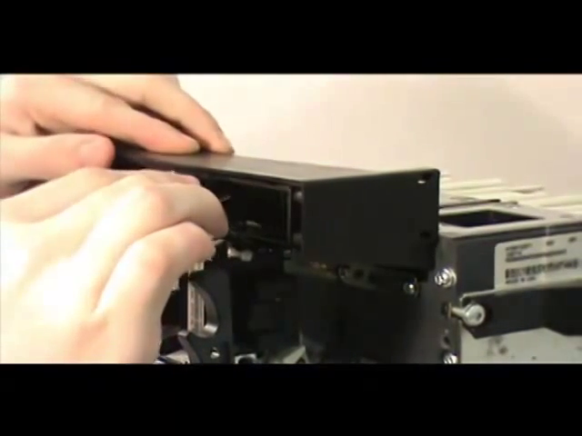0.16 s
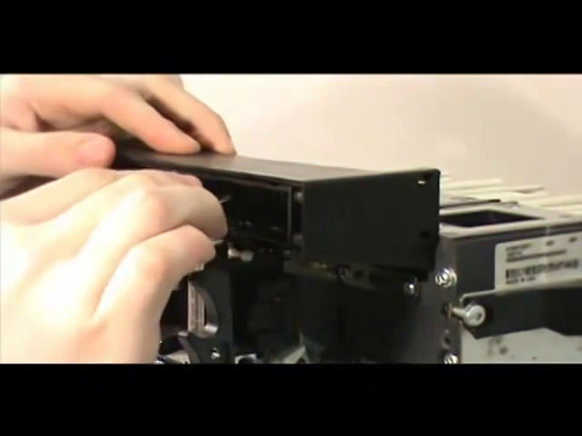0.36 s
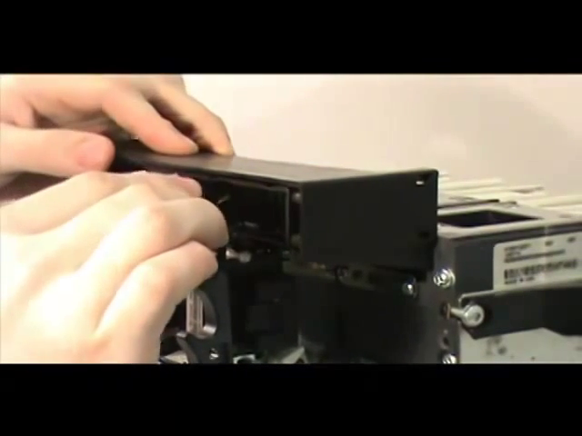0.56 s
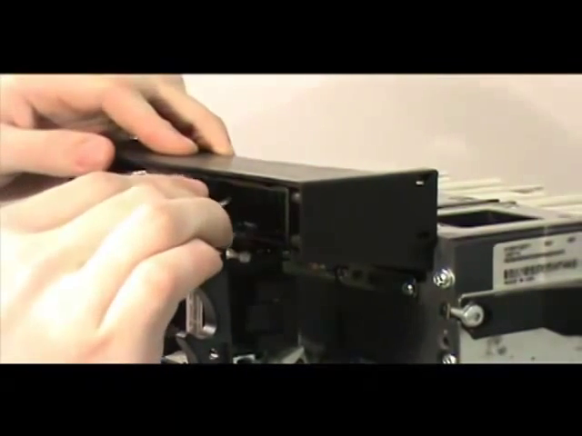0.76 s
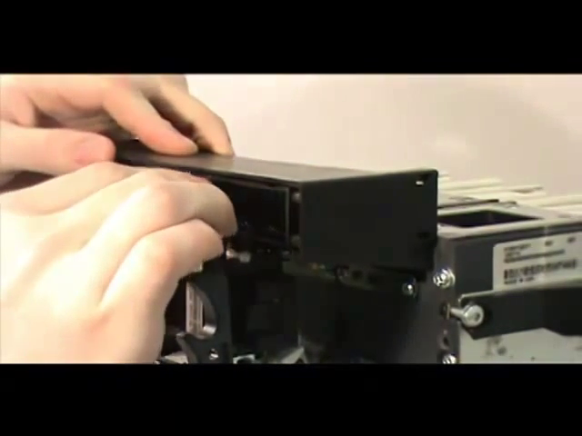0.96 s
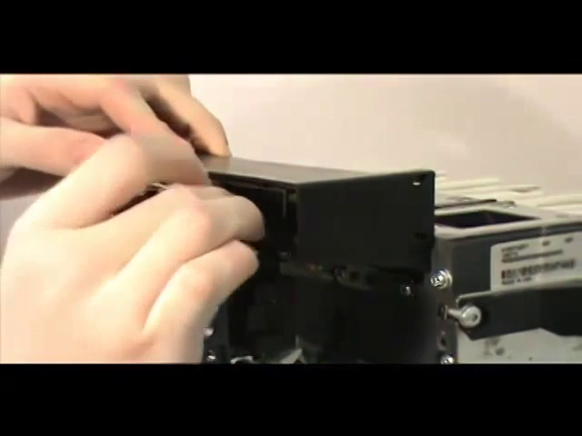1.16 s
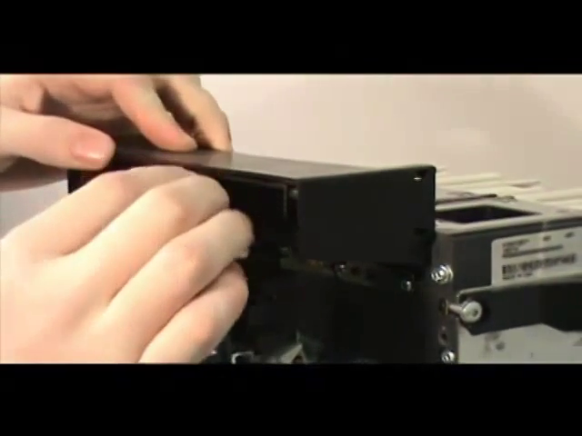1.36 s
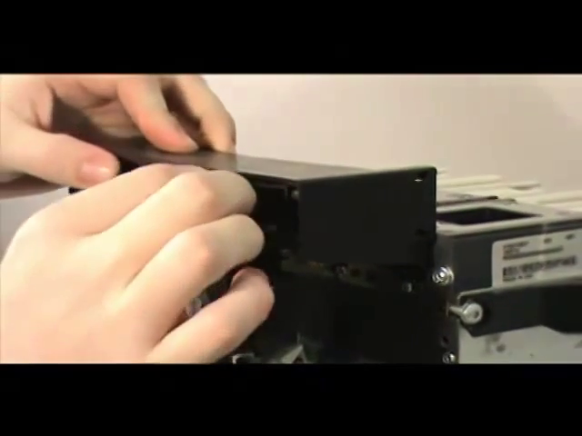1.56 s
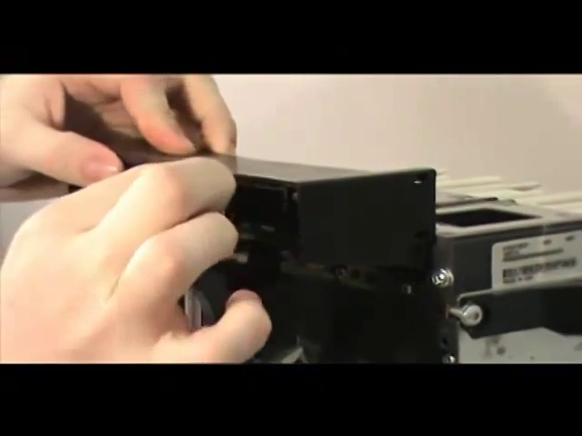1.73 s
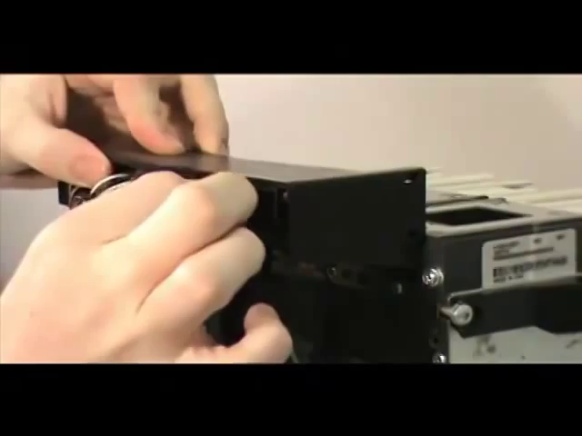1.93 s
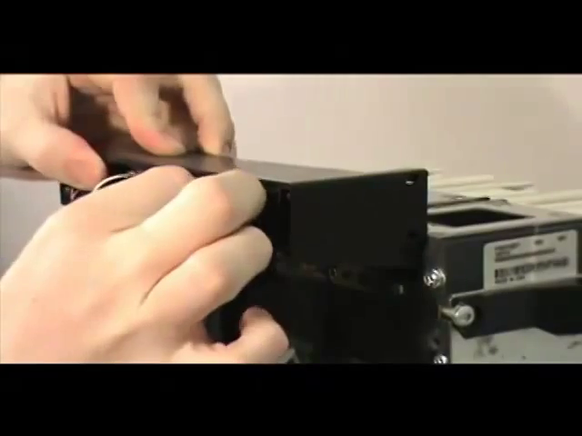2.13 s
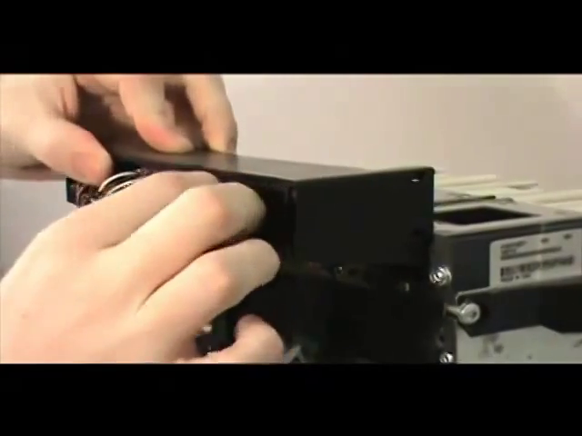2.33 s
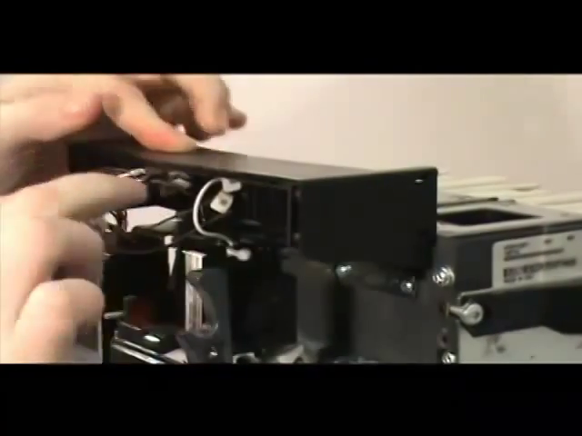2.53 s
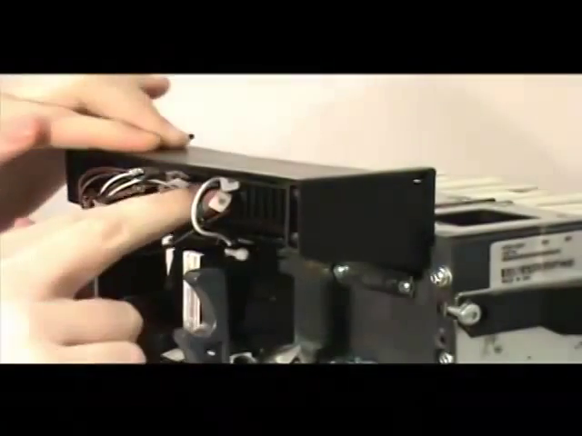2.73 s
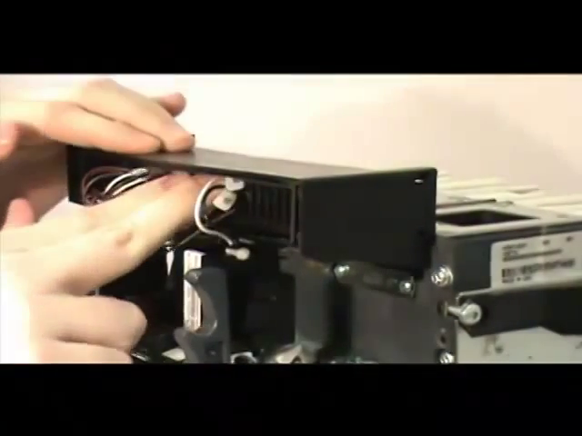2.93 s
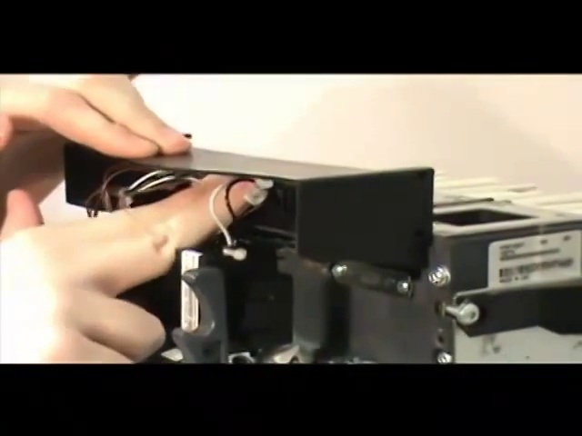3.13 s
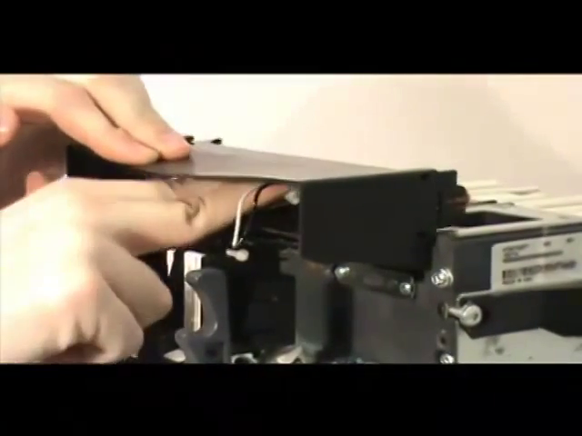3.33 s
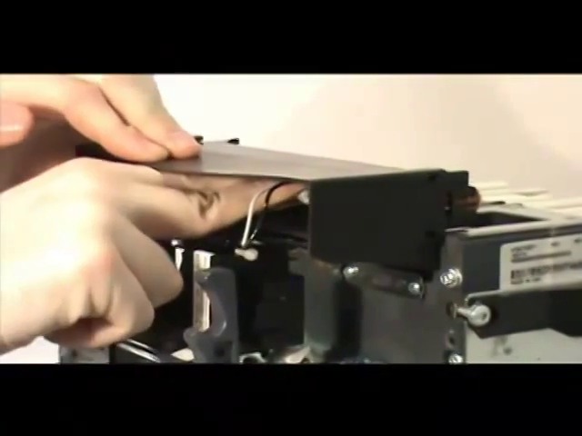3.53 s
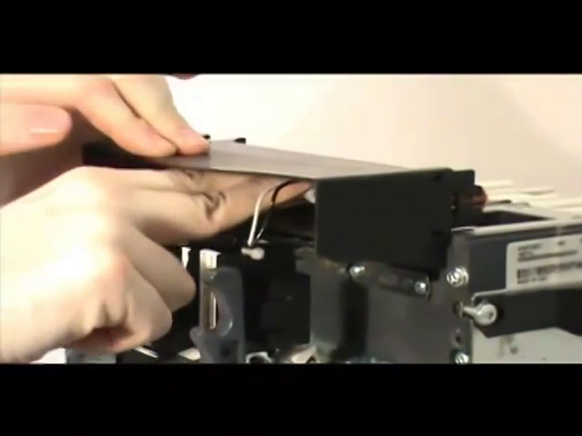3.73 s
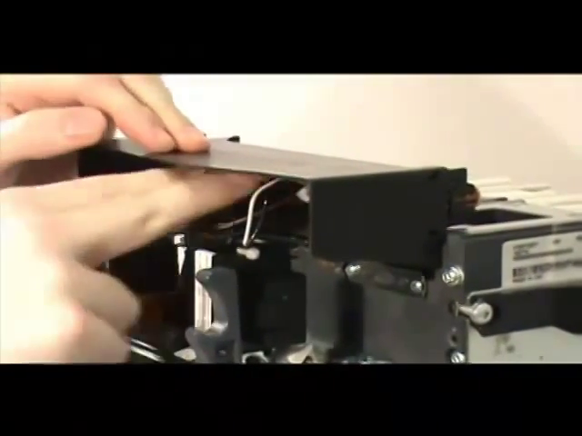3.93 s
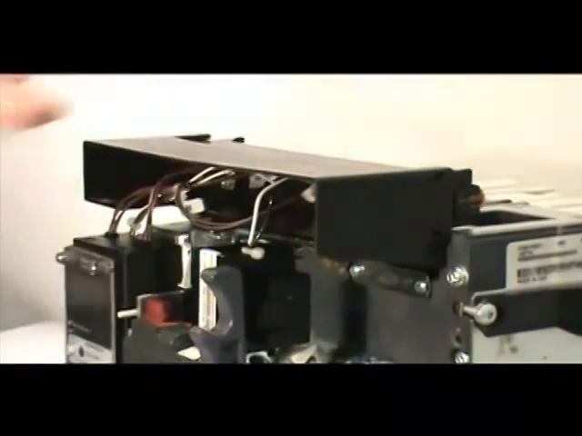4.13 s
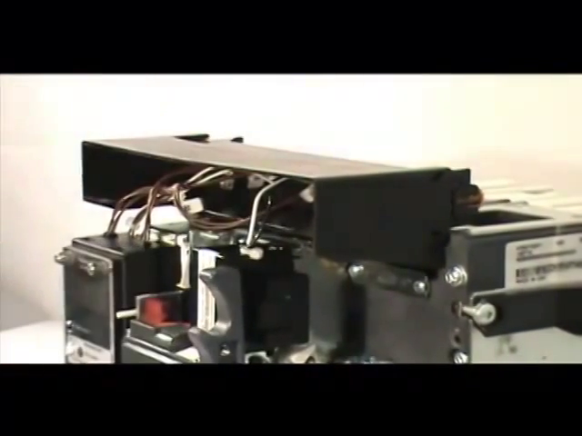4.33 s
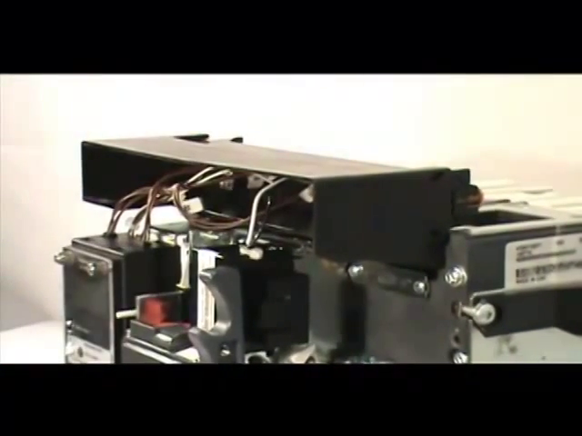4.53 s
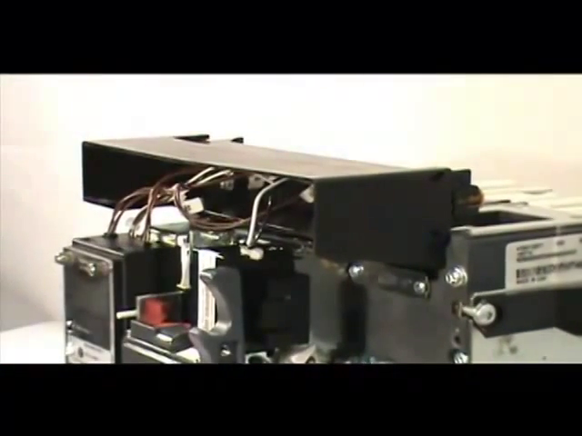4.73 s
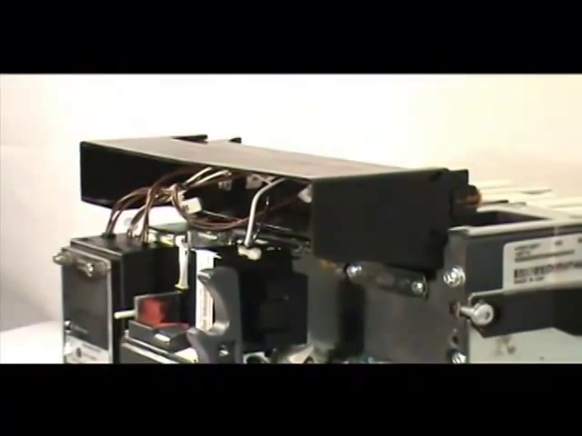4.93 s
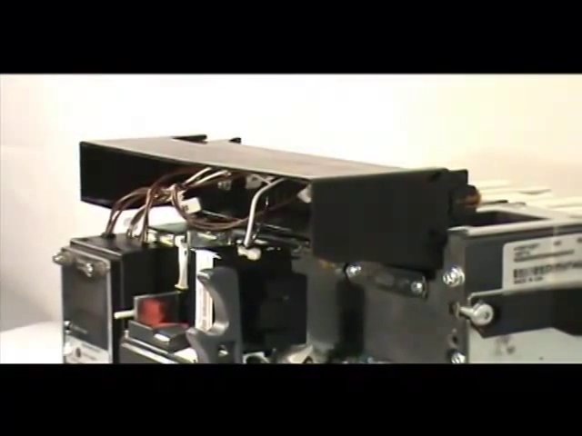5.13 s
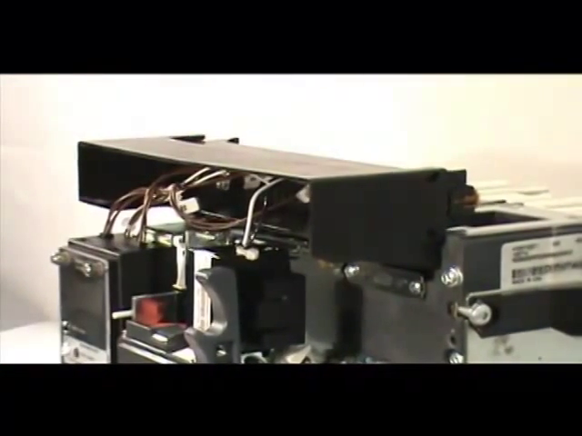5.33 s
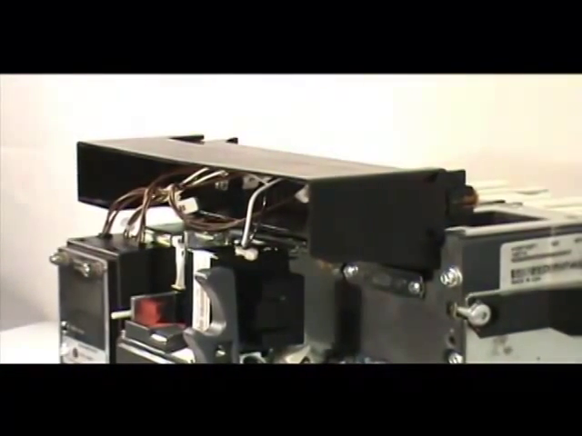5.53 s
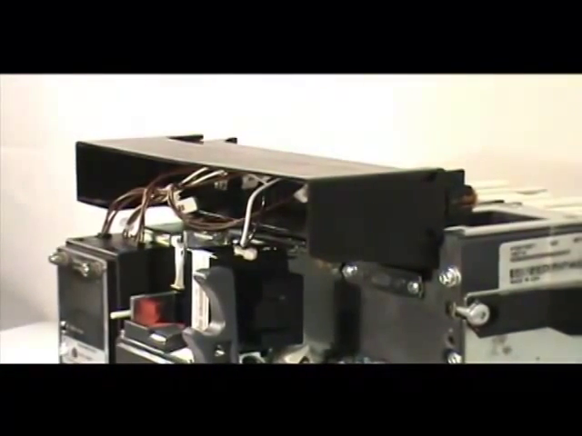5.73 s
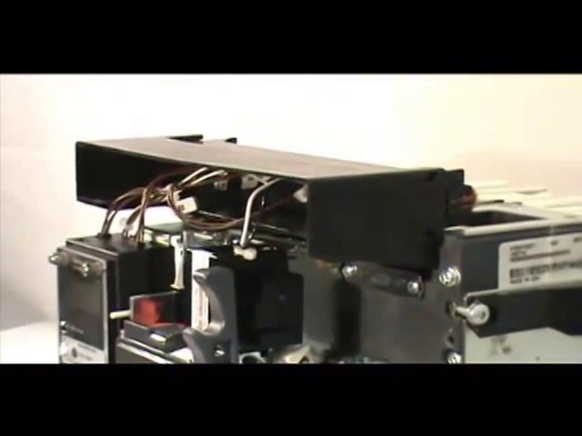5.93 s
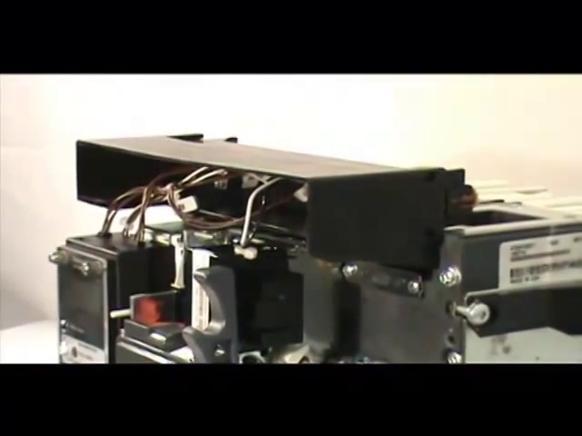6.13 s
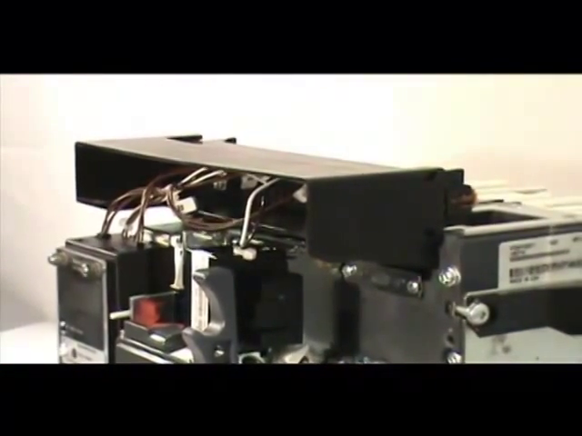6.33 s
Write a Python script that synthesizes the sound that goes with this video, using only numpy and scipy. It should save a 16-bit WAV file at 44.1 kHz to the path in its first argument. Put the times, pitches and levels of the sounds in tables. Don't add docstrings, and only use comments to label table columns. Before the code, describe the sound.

Close microphone in a small, quiet room. Fingers and wire leads tick and scrape on thin plastic walls. A dull snap comes first, then more sliding builds to a very sharp double snap with a short rattle, then one lighter click. After that the hands withdraw with soft cloth rustle, leaving a low beating hum, faint rumble and hiss.

```python
import sys
import numpy as np
from scipy import signal
from scipy.fft import rfft, irfft, next_fast_len
from scipy.io import wavfile
from scipy.ndimage import uniform_filter1d, map_coordinates

SR = 44100
rng = np.random.default_rng(int(sys.argv[2]) if len(sys.argv) > 2 else 0)


def master_out(mix):
    frames = np.transpose(np.atleast_2d(mix))
    ceiling = np.clip(frames, -1, 1)
    pcm = np.round(ceiling * 32767).astype(np.int16)
    wavfile.write(sys.argv[1], SR, pcm)


def level_to_linear(level):
    exponent = np.asarray(level, float) / 20
    return 10 ** exponent


N = 285926


def unit(x):
    return x / np.sqrt(np.mean(x ** 2) + 1e-20)


def along(points, hz):
    f, v = np.transpose(points)
    return np.interp(np.log(hz + 1), np.log(f + 1), v)


def curves(rows, outside=-120):
    s, *cols = np.transpose(rows)
    return [np.interp(np.arange(N) / SR, s, c, outside, outside) for c in cols]


def wobble(rate):
    knots = rng.standard_normal(int(N * rate / SR) + 4)
    return map_coordinates(knots, [np.arange(N) * rate / SR])


def filtered(x, response):
    m = next_fast_len(x.shape[-1] + 4096)
    spectrum = rfft(x, m) * response(np.fft.rfftfreq(m, 1 / SR))
    return irfft(spectrum, m)[..., :x.shape[-1]]


def resonances(modes):
    def response(f):
        return sum((-1) ** k * level_to_linear(db) * 1j * f * w / (c * c - f * f + 1j * f * w)
                   for k, (c, w, db) in enumerate(modes))
    return response


def rush(spectrum, width, patchy_db):
    z = signal.stft(rng.standard_normal((2, N)), nperseg=512)[2]
    patches = uniform_filter1d(rng.standard_normal(z.shape[1:]), 4, 0)
    patches = unit(uniform_filter1d(patches, 10, 1))
    pair = signal.istft(z * level_to_linear(patchy_db * patches), nperseg=512)[1][:, :N]
    mid, side = filtered(pair, lambda hz: level_to_linear(along(spectrum, hz) + [0 * hz, along(width, hz)]))
    return np.array([mid + side, mid - side]) / np.std(mid)


def add(track, s, peak_db, length, pan_db, modes, rise):
    t = np.arange(SR // 16) / SR - .004
    length = max(length, 2e-4)
    envelope = np.exp(-np.maximum(t / length, -t / (rise * length)))
    burst = rng.standard_normal((2, len(t))) * envelope
    burst[0, np.argmin(np.abs(t))] += .5 * np.sqrt(length * SR)
    mid, side = filtered(burst, resonances(modes))
    pair = level_to_linear(np.array([[.5], [-.5]]) * pan_db) * (mid + 0.19 * side * [[1], [-1]])
    part = track[:, round((s + t[0]) * SR):][:, :len(t)]
    part += (level_to_linear(peak_db) * pair / np.abs(mid).max())[:, :part.shape[1]]


def snaps():
    # (time [s], peak [dB], contact length [s], left over right [dB])
    dull_snap = [
        (2.073, -33, .002, 6),
        (2.0762, -22.5, 0.0018, 6),
        (2.0782, -11, 0.0008, 2.5),
        (2.0803, -16, 0.0012, 3),
        (2.083, -22, 0.0014, 2),
    ]
    sharp_snap = [
        (3.491, 0, 0.00039, 0.46),
        (3.4927, -7, 0.001, 1),
        (3.5022, -18, .001, 1),
        (3.5104, -15, .001, 1.5),
    ]
    second_snap = [(3.5287, -7.5, 0.001, 1.5), (3.5307, -5, 0.0013, .5), (3.5498, -19, .0004, 1),
                   (3.5578, -21, .001, 1), (3.5705, -21, .001, 1), (3.577, -22.5, .001, 1)]
    last_snap = [
        (4.0146, -22, .0015, 0),
        (4.0172, -9.5, 0.0007, .5),
        (4.0187, -12, 0.0004, 0.54),
        (4.0208, -18.5, 0.0028, .5),
        (4.0244, -24, 0.002, 0),
    ]
    # (frequency [Hz], width [Hz], level [dB])
    dull_ring = [(2015, 160, 9), (2720, 113, 7), (3070, 83, 6), (3510, 130, 6.5), (4600, 140, -4),
                 (6770, 140, -4.5), (9300, 370, -3), (9400, 87, -25.5)]
    sharp_ring = [(846, 50, -25.5), (2144, 170, -7.5), (3660, 220, -10.5), (4706, 60, 6), (5500, 290, -1),
                  (6300, 300, 3), (8330, 400, -4), (9700, 120, -17.5)]
    second_ring = [(846, 50, -25.5), (2200, 200, -18), (3660, 250, -14), (4670, 40, 7.5), (5800, 300, -10),
                   (6500, 200, -6.5), (7800, 200, -5), (8600, 200, -1)]
    last_ring = [(1996, 35, -11.5), (3470, 290, -2.5), (4100, 110, -7), (4940, 120, 2), (6070, 100, -7.5),
                 (7370, 130, -4), (8120, 130, -10), (10050, 180, -10.5)]
    track = np.zeros((2, N))
    for contacts, ring in [(dull_snap, dull_ring), (sharp_snap, sharp_ring),
                           (second_snap, second_ring), (last_snap, last_ring)]:
        modes = [(hz, 1.4 * width + 140, db) for hz, width, db in ring]
        modes += [(6160, 13800, -13.5)]
        for s, db, length, pan_db in contacts:
            add(track, s + .0007, db, length, pan_db, modes, .06)
    return track


def rattle():
    # (start [s], length [s], level [dB], fall [dB/s])
    bouts = [
        (2.086, 0.083, -36, 332),
        (3.496, 0.029, -28, 31),
        (3.534, 0.23, -22, 267),
        (4.026, 0.089, -37.5, 393),
    ]
    # (frequency [Hz], density [dB per Hz])
    dull_tail = [(240, -48), (450, -14), (700, -16), (985, 4), (1390, -9), (1970, -1), (3250, -1.5),
                 (4340, -13), (6680, -11), (11000, -6), (14300, -48), (22000, -120)]
    sharp_tail = [(240, -63.5), (400, -34), (513, -10), (687, -43), (757, -10), (1150, -6.5), (1720, -7),
                  (2140, 0), (2530, -4.5), (4590, -3.5), (11000, -10), (14300, -54.5), (22000, -120)]
    last_tail = [(240, -39), (400, -2), (1370, -14), (1510, -4), (2140, -5), (3070, -12), (3530, -3),
                 (11000, -18.5), (14300, -46.5), (22000, -120)]
    # (frequency [Hz], width [Hz], level [dB])
    dull_walls = [(964, 46, 5.5), (2024, 120, 11), (2650, 80, 2), (3219, 150, 11), (3650, 100, 8),
                  (5000, 300, 8), (6815, 250, 9)]
    sharp_walls = [(950, 80, 4), (2210, 100, 5), (3144, 80, 3), (3612, 81, 6), (4425, 100, 9.02),
                   (4715, 60, 6), (5190, 100, 6), (6150, 150, 7), (7780, 150, 5), (8296, 100, 7)]
    last_walls = [(2100, 90, 3), (3560, 73, 9.3), (4210, 70, 8), (5100, 90, 8.8), (5900, 90, 6),
                  (7241, 120, 7)]
    ring_share = .55
    colours = [dull_tail, sharp_tail, sharp_tail, last_tail]
    rings = [dull_walls, sharp_walls, sharp_walls, last_walls]
    track, reach = np.zeros((2, N)), SR // 400
    chatter = level_to_linear(1.6 * wobble(350) + .8 * wobble(80))
    for (s, length, db, fall_db), colour, ring in zip(bouts, colours, rings):
        at = np.arange(round(s * SR) - reach, round((s + length) * SR) + reach)
        grit = chatter[at] * rng.standard_normal((2, SR // 2))[:, :len(at)]
        mid, side = unit(filtered(grit, lambda hz: level_to_linear(along(colour, hz))
                                  * (1 + ring_share * np.abs(resonances(ring)(hz)))))
        level_db = db - fall_db * np.maximum(at / SR - s, 0)
        track[:, at] += level_to_linear(level_db + [[.7], [-.7]]) * (mid + 0.59 * side * [[1], [-1]])
    return track


def ticks():
    # (time [s], peak [dB], ring [Hz], left over right [dB])
    dull_ticks = [(0.342, -40.5, 5360, 17), (0.403, -40.5, 3200, 2), (0.443, -45, 1360, 9),
                  (0.6775, -41, 1810, 3), (1.182, -47, 2230, -1), (1.2526, -37.5, 3600, 10),
                  (1.3252, -35.5, 2600, 4), (1.365, -35.5, 2820, 4), (1.529, -34.5, 3100, -6),
                  (2.4982, -44, 2370, 13), (3.17, -44, 3400, 0), (4.241, -51, 835, 5), (5.2, -49, 910, 3),
                  (1.5865, -44, 2900, 4), (1.4015, -40, 5570, 2)]
    bright_ticks = [(0.093, -48, 3370, -1), (0.707, -43, 2180, 5), (0.92, -49, 5650, -8),
                    (1.243, -37.5, 2960, 6.5), (1.384, -37, 1910, -4), (1.4754, -40, 1900, 1),
                    (1.59, -26.5, 2820, 4.5), (1.6605, -42, 1850, 4), (1.926, -31, 4600, 0),
                    (2.036, -45, 1820, 3), (2.5438, -29, 2240, 1), (2.624, -35, 5570, -1.5),
                    (2.916, -43.5, 3270, -.5), (2.9736, -48, 915, -1), (3.7879, -46, 1560, -11),
                    (4.225, -44.5, 4360, -1), (1.3108, -36.5, 2980, 1), (3.9657, -34.5, 4370, 4),
                    (3.1635, -38.5, 5500, 1.5)]
    slow_ticks = [(0.374, -34.5, 2060, -1), (1.44, -33, 2080, 1), (1.503, -39, 2700, 4.5),
                  (2.5918, -39, 2870, 2), (3.1433, -35.5, 1090, 4), (3.399, -36.5, 1810, 9),
                  (3.9646, -34.5, 1875, 1), (6.473, -39.5, 1644, 3.5), (1.615, -44.5, 900, 0),
                  (1.678, -42.5, 1950, 2)]
    hollow_ticks = [(2.0888, -22, 2020, -4), (4.0285, -26, 5900, 0), (2.1685, -33, 1750, 1),
                    (2.1877, -34, 1780, 7), (2.2104, -35, 1720, 1), (2.3038, -31, 1760, 5),
                    (2.3306, -36, 1770, 1)]
    # (bright edge [dB], contact length [s])
    kinds = [
        (-36, 0.0035),
        (-14.5, 0.003),
        (-24.5, 0.01),
        (-20, 0.0023),
    ]
    track = np.zeros((2, N))
    for rows, (edge_db, length) in zip([dull_ticks, bright_ticks, slow_ticks, hollow_ticks], kinds):
        for s, db, hz, pan_db in rows:
            modes = [(hz, .12 * hz, 0), (950, 400, -19), (3600, 3000, -19), (7800, 5000, edge_db)]
            add(track, s, db, length, pan_db, modes, .3)
    return track


def knocks():
    # (time [s], peak [dB], ring [Hz], contact length [s])
    thumps = [(2.076, -39.5, 500, 0.04), (2.58, -48, 347, 0.02), (3.55, -36.5, 510, 0.017),
              (4.019, -40, 513, 0.044), (4.382, -48.5, 595, 0.02), (4.587, -46, 610, 0.02),
              (4.68, -46, 428, 0.016), (5.203, -44, 423, 0.006), (2.17, -50, 560, .03)]
    track = np.zeros((2, N))
    for s, db, hz, length in thumps:
        modes = [(.38 * hz, 70, -2), (hz, 160, 0), (2.05 * hz, 220, -3)]
        add(track, s, db, length, 0, modes, .2)
    return track


def pressure():
    # (peak time [s], rise [s], fall [s], body
    # level [dB], edge level [dB])
    strokes = [(.384, 0.024, 0.065, -61, -72), (0.708, 0.12, 0.026, -57, -57.5),
               (1.23, 0.38, .02, -61.5, -66), (1.25, .02, 0.022, -43.5, -47), (1.312, .012, .1, -52, -58),
               (1.363, 0.07, 0.097, -48, -46), (1.441, 0.019, 0.034, -45, -37),
               (1.536, 0.21, 0.039, -52, -70), (1.7, 0.084, 0.11, -50, -70),
               (2.07, 0.061, .003, -49.5, -50), (2.543, 0.044, .045, -50, -42.5),
               (2.63, 0.22, 0.082, -56, -52), (2.844, 0.095, 0.15, -55, -48),
               (3.016, 0.074, 0.13, -58.5, -53.5), (3.162, .05, 0.11, -45, -53),
               (3.274, 0.14, 0.079, -42.5, -38), (3.406, 0.064, 0.1813, -43.5, -37.5),
               (3.487, 0.0251, .003, -37.5, -30), (3.34, .1, .1, -51.5, -46), (2.5, 0.05, .06, -56.5, -66),
               (3.22, .1, .1, -43.5, -48), (6.224, .003, 0.012, -56, -43), (4.013, .008, .003, -52, -50),
               (3.44, .06, .1, -45, -35.5), (1.388, .02, .03, -51, -42), (4.61, .1, .08, -58, -49),
               (4.975, .12, .05, -60, -50), (4.78, .05, .05, -60, -54), (4.7, .04, .06, -58, -58)]
    # (time [s], fall [s], body level [dB], edge level [dB])
    skids = [(0.342, 0.11, -49.5, -68), (1.598, 0.063, -48.5, -55), (1.928, 0.052, -55.5, -56),
             (2.172, 0.021, -42, -66), (2.213, 0.024, -47.5, -68), (2.308, 0.041, -51, -67),
             (3.97, 0.034, -48.5, -63.5), (1.242, 0.092, -48, -54), (2.037, .05, -51.5, -68),
             (3.139, .05, -43, -58), (.677, .04, -53, -68)]
    skid_rise_s, swell_db = .003, 15
    t = np.arange(0, N / SR, .001)
    slides = list(strokes) + [(s, skid_rise_s, *rest) for s, *rest in skids]
    s, rise, fall, *peak_db = np.transpose(slides)[..., None]
    away = np.maximum((s - t) / np.maximum(rise, 1e-3), (t - s) / np.maximum(fall, 1e-3))
    return curves(np.c_[t, np.max(peak_db - swell_db * away, axis=1).T])


def scrape():
    # (frequency [Hz], width [Hz], level [dB])
    walls = [(813, 17.4, 6), (2006, 27, 3), (2660, 13, -3.5), (3343, 112, -1.5), (4270, 560, -21.5),
             (4080, 21.3, -6.5), (4830, 97, 4), (6310, 290, 2)]
    level_db, bright_db = pressure()
    grit = level_to_linear(2.8 * wobble(700) + .6 * wobble(60))
    slips = grit * rush([(100, 0)], [(100, 0)], patchy_db=2)
    damped = [(c, 4 * w + 150, db) for c, w, db in walls[:5]]
    body = filtered(slips[0], resonances(damped + [(2600, 1900, 3.5), (1050, 300, -3)]))
    body = filtered(body, resonances([(2385, 5700, 0)]))
    bright = resonances([(4700, 3000, 0), (9000, 3000, -4), (6200, 600, 0)])
    edge = filtered(slips[1], lambda f: bright(f) * f / (f + 3000))
    return level_to_linear([[.4], [-.4]]) * (level_to_linear(level_db - 1.5) * unit(body) + level_to_linear(bright_db - 9.0) * unit(edge))


def sleeve():
    # (time [s], level [dB])
    rustle = [(4.13, -69), (4.236, -60.5), (4.5, -58), (4.622, -55), (4.89, -61), (4.98, -54), (5.02, -63),
              (5.25, -67), (5.46, -77)]
    # (frequency [Hz], density [dB per Hz])
    colour = [(180, -33.5), (300, -0.5), (548, -4), (609, -3), (957, -2), (1260, -3), (4450, -6),
              (11000, -16.5), (14300, -46), (22000, -120)]
    cloth = rush(colour, [(300, -13.0), (3000, -4.5), (8000, 0.0)], patchy_db=3.0)
    return level_to_linear(curves(rustle)[0] + 1.1 * wobble(40) + 0.85 * wobble(10)) * cloth


def hum():
    # pitch [Hz], level [dB], random fading [dB]
    tone_hz = [119.8, 139.2]
    tone_db = [-61, -55.5]
    flutter_db = [7.5, 2]
    beat_s, beat_top_s, beat_depth = 2.294, .7, 0.32
    t = np.arange(N) / SR
    swell = [1, 1 + beat_depth * np.cos(2 * np.pi * (t - beat_top_s) / beat_s)]
    tones = np.zeros(N)
    for hz, db, fade_db, size in zip(tone_hz, tone_db, flutter_db, swell):
        level = size * level_to_linear(db + 1.5 + fade_db * np.minimum(wobble(5.5), .6))
        tones += level * np.sin(2 * np.pi * hz * t + 0.49 * wobble(3.8))
    return tones


def rumble_and_hiss():
    # (frequency [Hz], density [dB per Hz])
    rumble_colour = [(11, -29), (18, -1.5), (33, -4.5), (48, -12), (91, -10.5), (130, -4.5), (166, -14.5),
                     (243, -15), (311, -20), (362, -20.5), (700, -33.5), (910, -55.5), (1540, -120)]
    hiss_colour = [(240, -32), (400, -3.5), (1300, -9), (2500, -8.5), (5000, -13.5), (10700, -13.5),
                   (12000, -15)]
    # (frequency [Hz], side over mid [dB])
    width = [(25, -41), (60, -22), (120, -35.5), (220, -8), (430, -1), (840, 4.5), (1620, 8), (3130, 4.5),
             (6060, -5), (11000, -7)]
    rumble = level_to_linear(-57.0 + 0.52 * wobble(2.215)) * rush(rumble_colour, width, patchy_db=1.0)
    hiss = level_to_linear(-61) * rush(hiss_colour, width, patchy_db=1.15)
    return rumble, hiss


def room(x):
    # (frequency [Hz], time to fall 60 dB [s])
    t60 = [(300, 0.23), (2000, 0.25), (5000, 0.16), (10000, 0.12)]
    hz, t, z = signal.stft(rng.standard_normal((2, SR // 2)), SR, nperseg=256)
    decay = level_to_linear(-60 * t / along(t60, hz)[:, None])
    tail = signal.istft(z * decay, SR, nperseg=256)[1]
    late = np.pad(x, ((0, 0), (150, 0)))
    return signal.fftconvolve(late, tail / np.linalg.norm(tail[0]), axes=1)[:, :N]


def scene():
    # (time [s], level [dB])
    duck = [(3.5, -14.5), (3.51, -26), (3.535, -26), (3.545, 5), (3.6, 0)]
    loud, small = snaps(), ticks() + knocks()
    rumble, hiss = rumble_and_hiss()
    bass = level_to_linear(curves(duck, outside=0)[0]) * (rumble + hum())
    hands = loud + small + rattle() + scrape() + sleeve()
    return hands + room(level_to_linear(-13.5) * loud + level_to_linear(-6.5) * small) + bass + hiss


def thrift(pair):
    # (frequency [Hz], level over usual [dB])
    holes = [(250, -14), (600, -6), (1100, -3.1), (1900, -3.9), (3000, -6), (10800, -7), (10950, 19),
             (11700, 28)]
    # (frequency [Hz], level over mid [dB])
    masked = [(60, -46), (250, -12), (800, -9), (2500, -13.5), (4000, -3.5), (6000, -4.5), (11000, 1)]
    starve, recover = .07, .87
    hz, _, z = signal.stft(pair, SR, nperseg=1024)
    power = uniform_filter1d(uniform_filter1d(np.abs(z) ** 2, size=2, axis=1), size=5, axis=2)
    usual = np.median(power[0, :, ::4], axis=1, keepdims=True)
    around = uniform_filter1d(power[0], size=15, axis=0)
    total = power[0, hz > 600].sum(0) + 1e-20
    recent = signal.lfilter([1 - recover], [1, -recover], total)
    share = .36 + starve * np.log(np.maximum(recent / total, 1))
    valley = np.minimum(share, .75) * around * (hz[:, None] > 950)
    quiet = np.maximum(usual * level_to_linear(along(holes, hz))[:, None] ** 2, valley)
    hidden = np.minimum(around * level_to_linear(along(masked, hz))[:, None] ** 2, level_to_linear(-65) ** 2)
    kept = power > [quiet, hidden]
    kept[1] &= kept[0] | (hz[:, None] < 10800)
    return signal.istft(z * kept, SR, nperseg=1024)[1][:, :N]


def band_limit(x):
    return signal.sosfilt(signal.butter(12, 12320, fs=SR, output="sos"), x)


def record(dry):
    band = [(10900, 0.5), (11600, -26.5), (12300, -43), (14000, -70)]  # (frequency [Hz], level [dB])
    soft = dry / (1 + np.abs(dry / .9) ** 6) ** (1 / 6)
    left, right = filtered(soft, lambda hz: level_to_linear(along(band, hz)))
    mid, side = thrift(np.array([left + right, left - right]) / 2)
    return band_limit(np.array([mid + side, mid - side]))


dry = scene()
out = record(dry)
master_out(out)
```